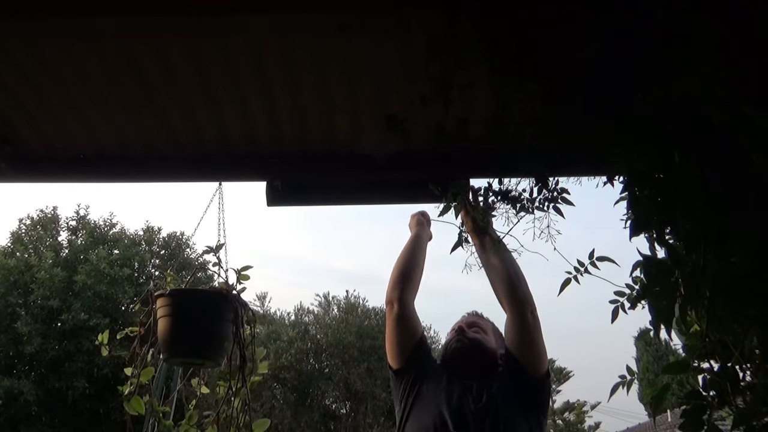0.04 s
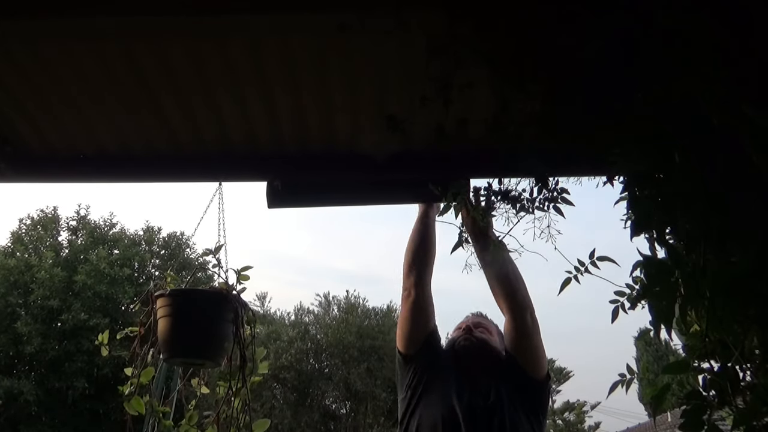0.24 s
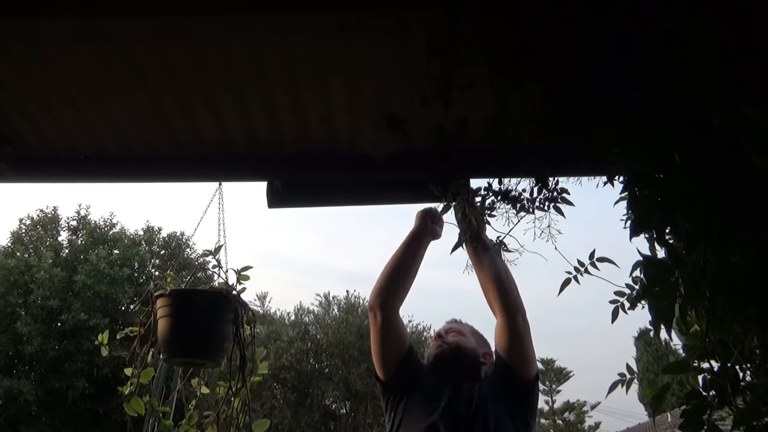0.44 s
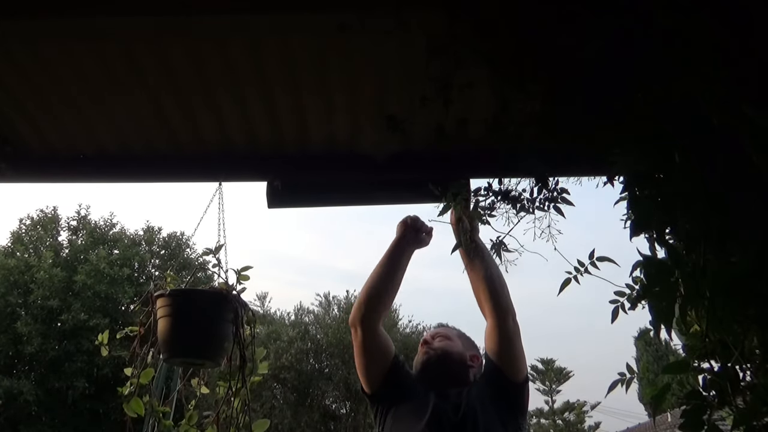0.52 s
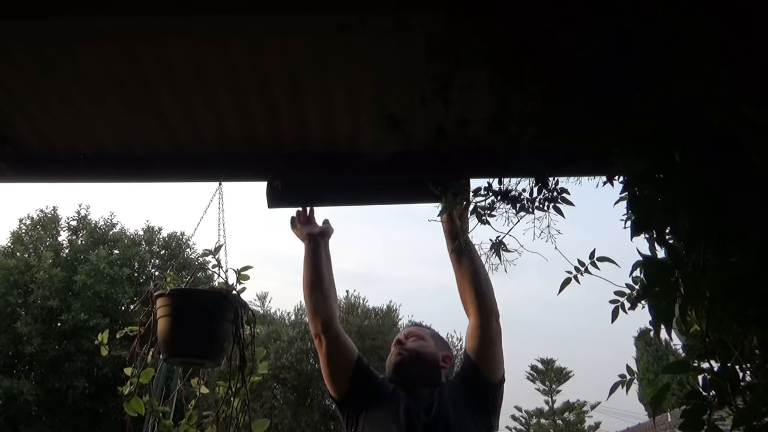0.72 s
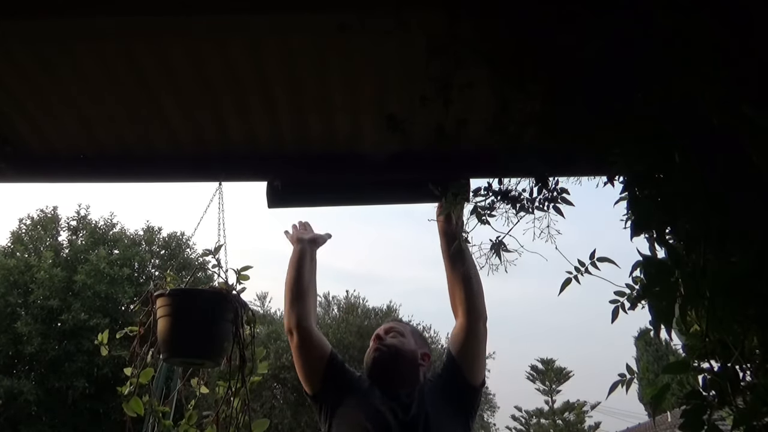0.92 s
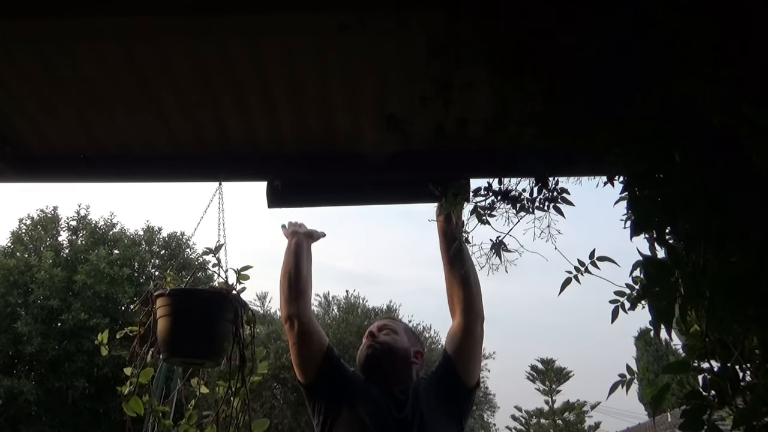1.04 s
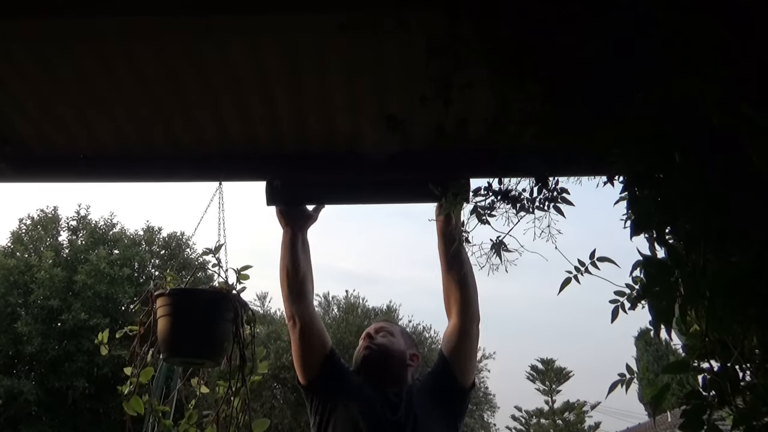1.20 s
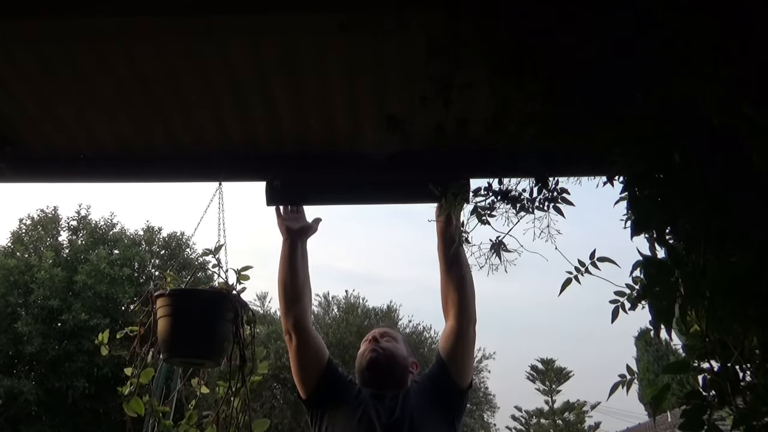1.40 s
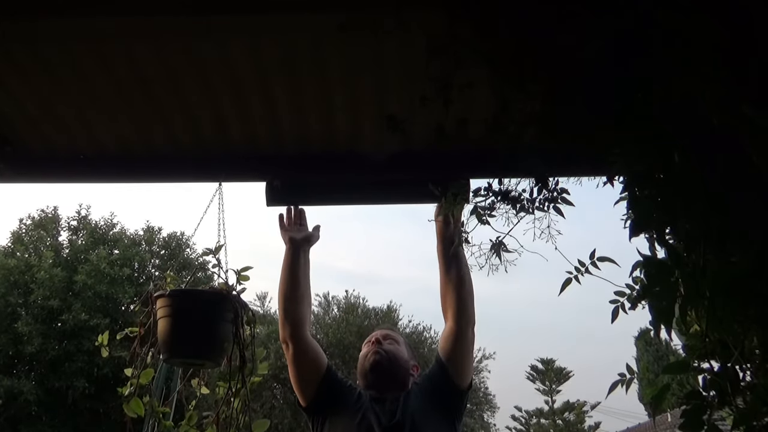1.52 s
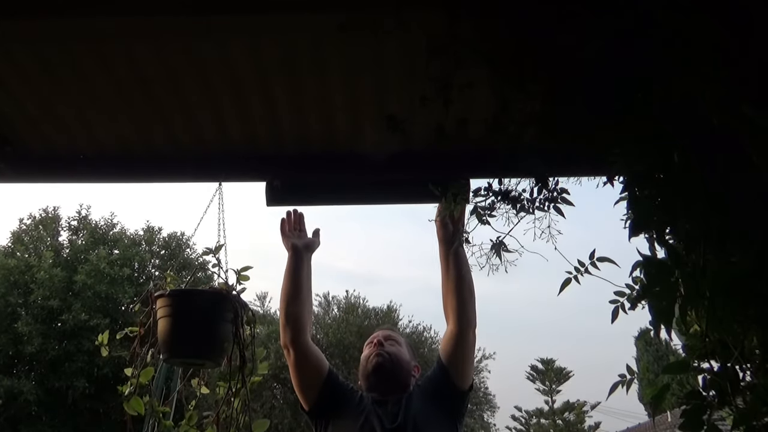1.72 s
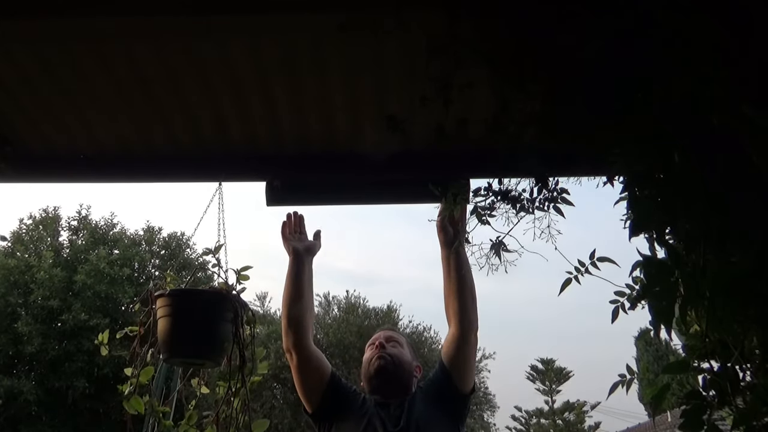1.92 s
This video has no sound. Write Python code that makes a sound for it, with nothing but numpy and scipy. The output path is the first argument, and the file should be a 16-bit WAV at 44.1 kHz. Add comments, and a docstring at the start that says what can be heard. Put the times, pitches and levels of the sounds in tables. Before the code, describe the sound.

Two loud, booming bangs on a sheet-metal roof panel, each followed by rattling.

```python
"""Over quiet garden air, a fist bangs from below on a sheet-metal panel at the edge of a patio roof:
a crack, then the roof booms and the loose sheet chatters on its frame. A creeper rustles, a distant
bird gives one note, and the panel settles with a soft bump, a scrape and thin squeaks. The palm strikes
next: another crack and boom, and the sheet swings back and rattles. Small ticks and more rustling
follow as the roof rings out."""
import sys
import numpy as np
from scipy import signal
from scipy.fft import rfft, irfft, next_fast_len
from scipy.io import wavfile
from scipy.ndimage import uniform_filter1d

SR = 44100
rng = np.random.default_rng(int(sys.argv[2]) if len(sys.argv) > 2 else 0)


def log_audio(samples):
    """Write samples as a 16-bit WAV file to the path given in sys.argv[1]."""
    # one column per channel
    frames = np.atleast_2d(samples).T
    # limit to full scale, then quantise
    limited = np.clip(frames, -1, 1)
    pcm = np.round(limited * 32767).astype(np.int16)
    wavfile.write(sys.argv[1], SR, pcm)


N = 85995

# stereo width, nearly mono in the bass: f/Hz, side over mid/dB
STEREO_WIDTH = [(50, -39), (130, -19), (500, -13), (1000, -9), (4000, -10.5), (8500, -11.5), (11500, -17)]
# tone of the sheet hitting its frame: f/Hz, level/dB
KNOCK_SPECTRUM = [(60, -3), (200, -2), (700, 6), (1500, -4), (2500, -15.5), (6000, -31), (10000, -29.5),
                  (16000, -63)]


def amp(db):
    """Decibels to gain."""
    return np.exp(np.asarray(db) * (np.log(10) / 20))


def unit(x):
    """Scale to an rms of 1."""
    return x / np.sqrt(np.mean(x ** 2) + 1e-20)


def along(points, hz):
    """Read a curve of (f/Hz, value) points on a log frequency axis."""
    freqs, values = np.transpose(points)
    return np.interp(np.log(hz + 1), np.log(freqs + 1), values)


def filtered(x, response):
    """EQ: response gives the gain at each frequency."""
    size = next_fast_len(N + SR // 2)
    return irfft(rfft(x, size) * response(np.fft.rfftfreq(size, 1 / SR)), size)[..., :N]


def noise(colour, width_db=0):
    """Stereo noise of rms 1; colour gives the relative dB at each frequency."""
    size = next_fast_len(N, real=True)
    hz = np.fft.rfftfreq(size, 1 / SR)
    white = rng.standard_normal((2, len(hz), 2)).view(complex)[..., 0]
    mid, side = white * amp(colour(hz))
    side = side * amp(along(STEREO_WIDTH, hz) + width_db)
    return unit(irfft([mid + side, mid - side], size)[:, :N])


def hiss(spectrum, width_db=0):
    """Stereo noise shaped by (f/Hz, level/dB) points."""
    return noise(lambda hz: along(spectrum, hz), width_db)


def band_noise(centre, octaves):
    """Noise in a rounded hump around one frequency."""
    return noise(lambda hz: -3 * (np.log2((hz + 1) / centre) / octaves) ** 2)


def flat_band(centre, half_width_hz):
    """Noise in a steep-sided band."""
    return noise(lambda hz: -10 * np.log10(1 + ((hz - centre) / half_width_hz) ** 8))


def envelope(start, t60, rise=0.00096, hold=0):
    """Attack, hold, then an exponential decay; all times in seconds."""
    first = int(start * SR)
    t = np.arange(min(N - first, int((hold + 2 * t60) * SR))) / SR
    shape = (1 - np.exp(-t / rise)) * amp(-60 * np.maximum(t - hold, 0) / t60)
    return np.pad(shape, (first, N - first - len(t)))


def burst(sound, shape):
    """Noise under a short envelope, with the energy that the envelope sets."""
    return unit(sound * shape) * np.sqrt(np.mean(shape ** 2))


def taps(rows, sound, t60):
    """Short dead contacts of one colour, one per (t/s, level/dB) row."""
    return sum(amp(db) * burst(sound, envelope(start, t60)) for start, db in rows)


def grain(depth_db, samples):
    """A fast random gain flutter that roughens a noise."""
    return amp(depth_db * unit(uniform_filter1d(rng.standard_normal(N), size=samples)))


def waver(depth, per_s):
    """A slow drift around zero, gliding between random values."""
    position = np.arange(N) * per_s / SR
    return depth * np.interp(position, np.arange(SR // 100), rng.standard_normal(SR // 100))


def garden_air():
    """A quiet, steady bed of dark outdoor noise."""
    # tone of the air: f/Hz, level/dB
    spectrum = [(25, 3), (45, -1), (90, 6.5), (170, 0), (700, -3), (1400, -11), (2900, -13.5), (4500, -19),
                (9000, -22), (12000, -29), (16000, -32)]
    return amp(-48.5) * hiss(spectrum, width_db=2.5)


def bird():
    """One thin, clean note far off in the garden."""
    pitch_hz = 4495
    note = unit(np.sin(2 * np.pi * pitch_hz * np.arange(N) / SR))
    return amp(-66) * note * envelope(start=0.806, t60=0.08, rise=0.008, hold=0.052)


def creeper():
    """Grainy rustles of shaken leaves."""
    # shakes of the creeper: t/s, level/dB, t60/s
    rustles = [(0.579, -48, 0.61), (1.589, -53, 0.81), (1.745, -52, 0.99)]
    # tone of the leaves: f/Hz, level/dB
    spectrum = [(500, 6.5), (2500, 1), (9500, -0.5), (12000, -14), (16000, -18)]
    leaves = unit(grain(depth_db=3.2, samples=150) * hiss(spectrum))
    return leaves * sum(amp(db) * envelope(start, t60, rise=0.0032) for start, db, t60 in rustles)


def ticks():
    """Small dry ticks, each around its own pitch."""
    # tick cues: t/s, level/dB, centre f/Hz
    cues = [(1.026, -55.5, 7200), (1.524, -47, 7040), (1.559, -43.5, 8900), (1.715, -44.5, 2800),
            (1.739, -39.5, 3750), (1.806, -45.5, 4000), (1.822, -46.5, 5130)]
    return sum(amp(db) * envelope(start, t60=0.046) * band_noise(centre, octaves=0.52)
               for start, db, centre in cues)


def squeaks():
    """Faint narrow squeaks as the sheet's edge rubs on its frame."""
    # rubs of the edge: t/s, hold/s, centre f/Hz, level/dB
    rubs = [(0.876, 0.003, 4200, -46), (0.928, 0.048, 6300, -63), (1.305, 0.015, 6230, -42)]
    return sum(amp(db) * flat_band(hz, half_width_hz=190) * envelope(start, 0.12, rise=0.004, hold=hold)
               for start, hold, hz, db in rubs)


def settling():
    """The panel settles between the blows: a soft thud with a scrape of its edge on top."""
    # tone of the thud: f/Hz, level/dB
    thud_spectrum = [(40, -7), (170, 1.5), (300, -7.5), (650, -16.5), (930, -16.5), (1300, -29),
                     (5000, -30.5), (16000, -56)]
    # scrapes of the edge: t/s, level/dB
    scrapes = [(.875, -35.5), (.8803, -29)]
    # tone of a scrape: f/Hz, level/dB
    scrape_spectrum = [(300, -4), (2000, -8), (3300, -5.5), (4200, 3.5), (5000, -2.5), (6500, -2),
                       (10000, -10), (15000, -41)]
    thud = amp(-30) * burst(hiss(thud_spectrum), envelope(start=0.87, t60=0.37, rise=0.0075))
    return thud + taps(scrapes, hiss(scrape_spectrum), t60=0.027)


def chatter(start):
    """Random light contacts of the loose sheet, dying with its swing."""
    contacts_per_s, scatter_db = 150, 3.5
    contacts = (rng.random(N) < contacts_per_s / SR) * amp(scatter_db * rng.standard_normal(N))
    pulses = np.abs(signal.fftconvolve(contacts, envelope(0, t60=0.012))[:N])
    return unit(pulses * hiss(KNOCK_SPECTRUM)) * envelope(start, t60=0.97, rise=0.0097, hold=0.042)


def rebounds():
    """The sheet swings back against its frame and rattles briefly, duller than a single knock."""
    # return swings: t/s, hold/s, level/dB
    swings = [(1.222, 0.1, -23), (1.377, 0.034, -28.5)]
    lowpass_hz = 5000
    roughness = grain(depth_db=2.5, samples=200)
    rattle = noise(lambda hz: along(KNOCK_SPECTRUM, hz) - 10 * np.log10(1 + (hz / lowpass_hz) ** 2))
    shape = sum(amp(db) * envelope(start, t60=0.15, rise=0.0076, hold=hold) for start, hold, db in swings)
    return unit(roughness * rattle) * shape


def knocks():
    """The loose sheet hits its frame: a hard clack on a duller thud."""
    # hits on the frame: t/s, relative level/dB
    hits = [(.2812, -18), (.305, -24), (.3718, -30), (.383, -27), (.4556, -29), (.516, -45), (.5404, -31.5),
            (.5709, -33), (.6222, -38), (.6866, -46), (1.2057, -28), (1.2237, -20), (1.2462, -20),
            (1.3055, -22.5), (1.3804, -25.5), (1.5814, -42), (1.6572, -38)]
    clacks = taps(hits, flat_band(centre=1474, half_width_hz=310), t60=0.022)
    thuds = taps(hits, hiss(KNOCK_SPECTRUM), t60=0.055)
    return amp(3.5) * clacks + amp(-2.5) * thuds


def heaves():
    """Driven up or dropping back, the sheet swings for a few low cycles; its pitch sags as it slackens."""
    # swings of the whole sheet: t/s, level/dB, starting f/Hz
    swings = [(.248, -21.5, 104.3), (.276, -20, 238), (.286, -19.5, 147.5), (.418, -27, 95),
              (0.87, -35.5, 186), (1.173, -16.5, 223.2), (1.29, -25.5, 83.9), (1.386, -27.5, 212.9)]
    sag_octaves_per_s = 1.16
    t = np.arange(N) / SR
    out = np.zeros(N)
    for (start, db, hz), turn in zip(swings, rng.random(len(swings))):
        pitch = hz * 2 ** (-sag_octaves_per_s * np.maximum(t - start, 0))
        tone = unit(np.sin(2 * np.pi * (np.cumsum(pitch) / SR + turn)))
        out += amp(db) * tone * envelope(start, t60=0.1, rise=0.0088, hold=0.021)
    return out


def roof_wash(start, hold, tilt_db, decay_scale, ripple_db):
    """The roof's crowded modes blur into a wash, with a low after-ring that outlasts the treble."""
    # tone of the roof before tilt and ripple: f/Hz, level/dB
    spectrum = [(25, -9.5), (50, -7.5), (85, 0.5), (140, 1.5), (400, -3), (800, -4.5), (1500, -8.5),
                (2500, -16.5), (5500, -24), (9000, -32), (12000, -46), (16000, -56)]
    # decay of the roof: f/Hz, t60/s before decay_scale
    decays = [(50, 1.04), (130, 0.63), (350, 1.26), (900, 0.73), (2400, 0.72), (6000, 0.47), (12000, 0.56)]
    # build-up of the roof: f/Hz, attack/s
    attacks = [(80, 0.0041), (300, 0.0076), (1000, 0.0097), (3000, 0.0018)]
    # how long the bang's level stays flat before it decays: f/Hz, share of the hold
    hold_shares = [(100, 1), (1000, 0.75), (3000, 0.77), (6000, 0.89), (12000, 0.21)]
    ripple_step_hz, after_corner_hz = 14, 510

    def colour(hz):
        resonances = np.interp(hz / ripple_step_hz, np.arange(len(ripple_db)), ripple_db)
        return along(spectrum, hz) + resonances + tilt_db * np.log2(np.maximum(hz / 500, 1))

    ring = rfft(noise(colour))
    bin_hz = np.fft.rfftfreq(N, 1 / SR)
    centres = np.geomspace(60, 13000, 8)
    out = np.zeros((2, N))
    for hz, share in zip(centres, np.eye(len(centres))):  # overlapping bands, each with its own envelope
        band = irfft(ring * along(np.c_[centres, share], bin_hz), N)
        rise = along(attacks, hz)
        body = envelope(start, decay_scale * along(decays, hz), rise, hold * along(hold_shares, hz))
        after_ring = amp(-7.5) / (1 + (hz / after_corner_hz) ** 2) * envelope(start, t60=2.36, rise=rise)
        out += band * np.sqrt(body ** 2 + after_ring ** 2)
    return out


def panel_boom(start, hold, tilt_db):
    """The panel's own modes ring and waver as it flexes, in a different balance at every blow."""
    # modes of the panel: f/Hz, relative level/dB, t60/s
    modes = [(81.6, -13, 0.84), (104.1, -3, 0.93), (210, -3, 0.87), (221, -3, 0.75), (301.3, 2.5, 0.96),
             (310.6, -10.5, 1.77), (432, -8, 1.3), (494.8, -2.5, 1.2), (726, -6, 1.03), (755, -5, 1.14),
             (1001, -6.5, 0.62), (1190, -18, 0.6), (1334, -10, 0.62), (1446, -6, 0.55)]
    pivot_hz, hold_share = 350, 0.76
    t = np.arange(N) / SR
    out = np.zeros((2, N))
    for (hz, db, t60), (scatter_db, turn, spread) in zip(modes, rng.standard_normal((len(modes), 3))):
        stereo_phase = np.array([[1], [-1]]) * spread * amp(along(STEREO_WIDTH, hz))
        phase = 2 * np.pi * (hz * t + turn) + stereo_phase
        level = amp(db + scatter_db + tilt_db * np.log2(hz / pivot_hz))
        level_drift, phase_drift = (waver(depth=0.36, per_s=22) for _ in range(2))
        ring = (1 + level_drift) * np.sin(phase) + phase_drift * np.cos(phase)
        out += level * ring * envelope(start, t60, rise=0.011, hold=hold * hold_share)
    return out


def crack(start, tilt_db, t60=0.03, width_db=0):
    """A bright burst of contact with the sheet, held while the hand flattens."""
    # tone of the contact before tilt: f/Hz, level/dB
    spectrum = [(100, -16), (500, -0.5), (1500, 2), (4500, -5), (5700, 0), (6800, -6.5), (10000, -8.5),
                (13000, -23), (16000, -26)]
    contact_s = 0.0017
    sound = noise(lambda hz: along(spectrum, hz) + tilt_db * np.log2(np.maximum(hz / 1500, 1)), width_db)
    return burst(sound, envelope(start, t60, rise=0.0007, hold=contact_s))


def bangs():
    """Both blows and all they shake: the hand's crack, the sheet's slap on its frame, then the ringing."""
    # fist, then palm: t/s, crack level/dB, crack tilt/(dB/octave), slap delay/s, slap level/dB,
    # wash level/dB, base hold/s, wash tilt/(dB/octave), wash decay factor, boom level/dB,
    # boom tilt/(dB/octave), chatter level/dB, ringing left over right/dB
    blows = [(0.2435, -14.5, 0.4, 0.0069, -21.5, -19, 0.044, 1.43, 1, -25, -2, -27, -0.1),
             (1.1609, -12, -1.5, 0.009, -24, -18, 0.13, 0, 0.89, -28.5, 0.9, -31, 0.5)]
    ripple_db = 2.5 * rng.standard_normal(SR // 4)  # the same roof resonances for both blows
    out = knocks() + heaves() + rebounds()
    for (start, crack_db, crack_tilt, slap_delay, slap_db, wash_db, hold, wash_tilt, decay_scale,
         boom_db, boom_tilt, chatter_db, pan_db) in blows:
        slap_tail = crack(start + slap_delay, crack_tilt, t60=0.25)
        slap_snap = amp(-0.5) * crack(start + slap_delay, crack_tilt)
        hand = amp(crack_db) * crack(start, crack_tilt, width_db=-15)
        ringing = amp(wash_db) * roof_wash(start, hold, wash_tilt, decay_scale, ripple_db)
        ringing += amp(boom_db) * panel_boom(start, hold, boom_tilt)
        ringing += amp(chatter_db) * chatter(start)
        pan = amp([[pan_db / 2], [-pan_db / 2]])
        out += hand + amp(slap_db) * (slap_tail + slap_snap) + pan * ringing
    return out


def scene():
    """The banged roof in its garden, the whole mix leaning slightly left."""
    # stereo balance: f/Hz, left over right/dB
    lean = [(130, 0.74), (1000, 1.66), (6000, 0.5)]
    mix = bangs() + settling() + squeaks() + ticks() + creeper() + bird() + garden_air()
    return filtered(mix, lambda hz: amp(np.outer([0.5, -0.5], along(lean, hz))))


def record(dry):
    """A brick-wall low-pass takes off the very top."""
    cutoff_hz = 16200
    return filtered(dry, lambda hz: hz < cutoff_hz)


dry = scene()
out = record(dry)
log_audio(out)
```